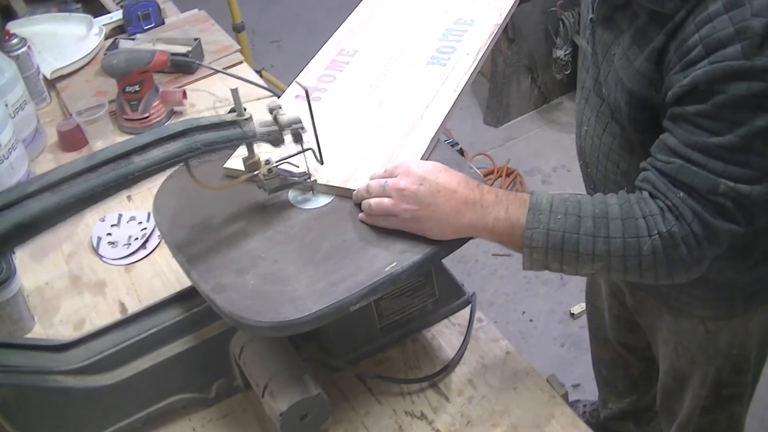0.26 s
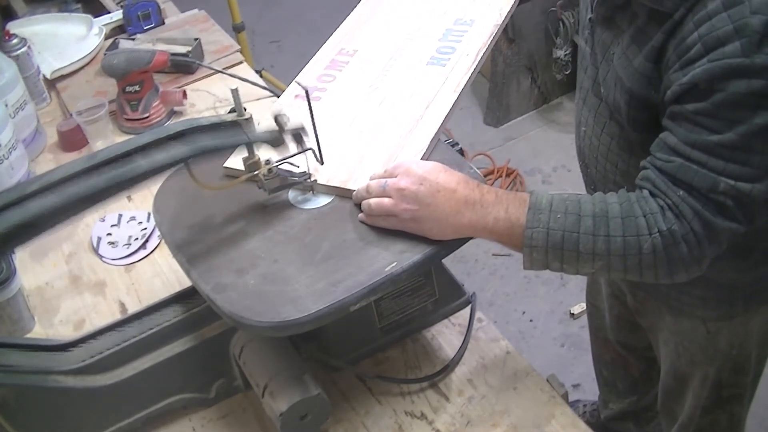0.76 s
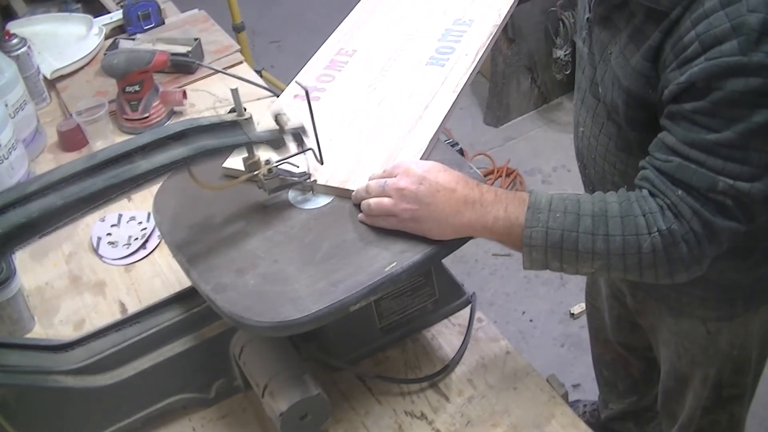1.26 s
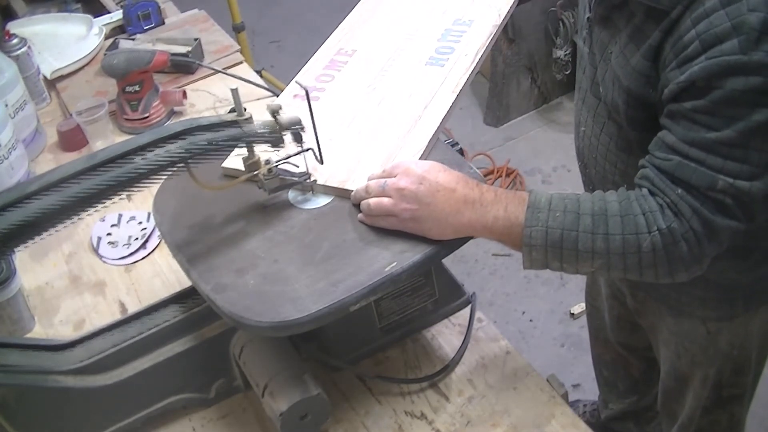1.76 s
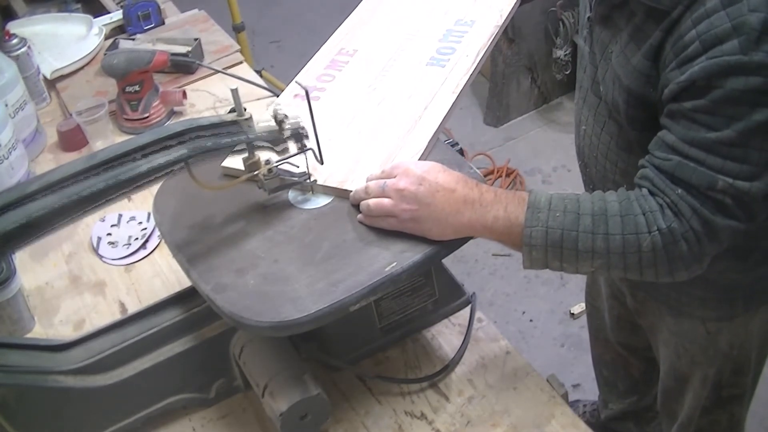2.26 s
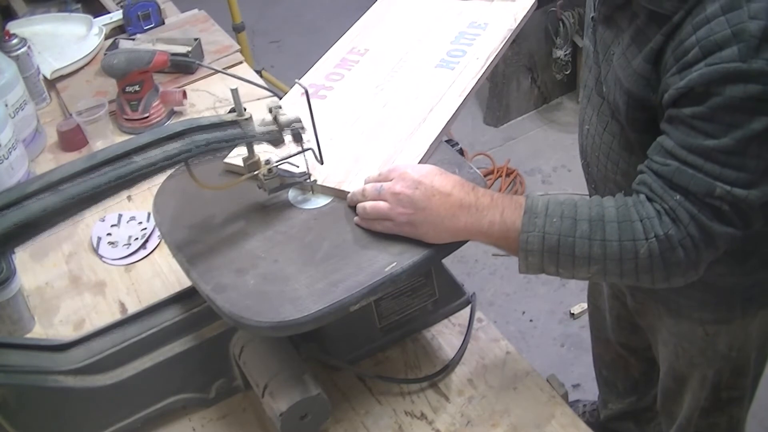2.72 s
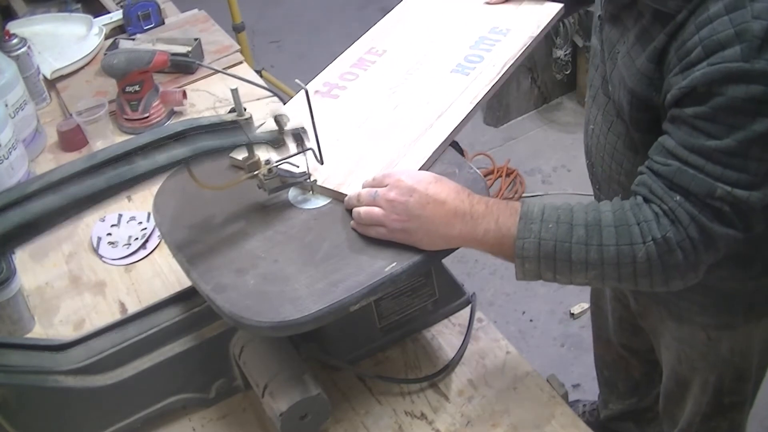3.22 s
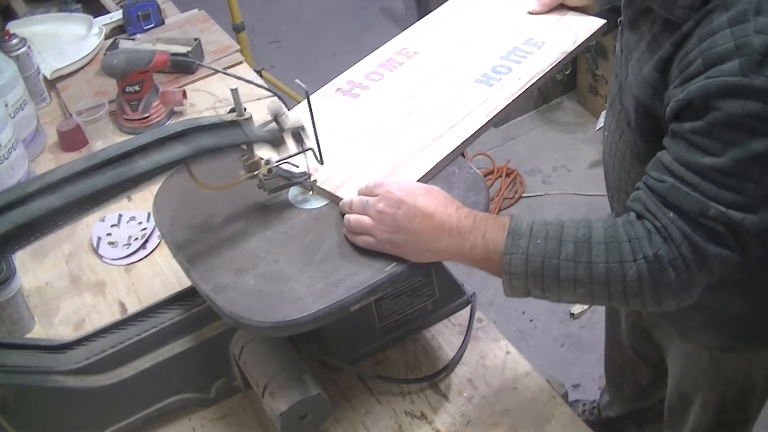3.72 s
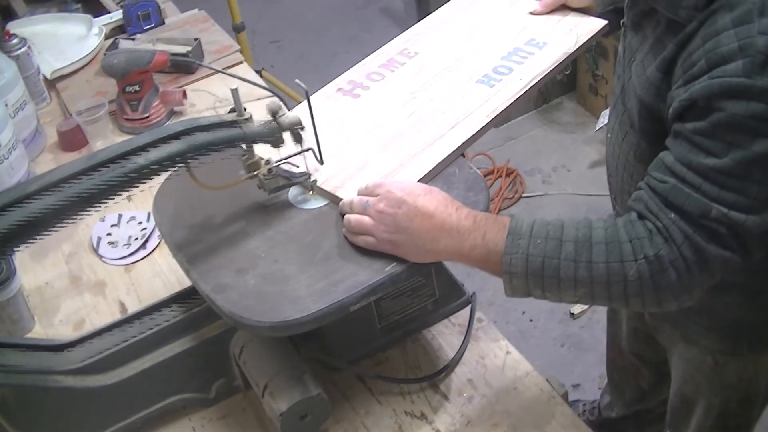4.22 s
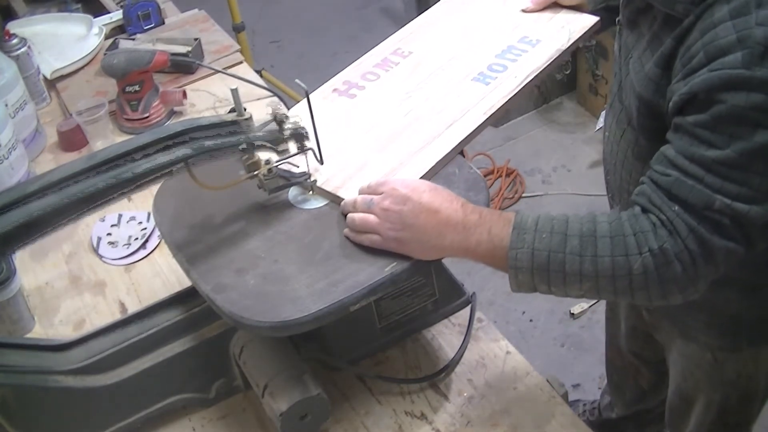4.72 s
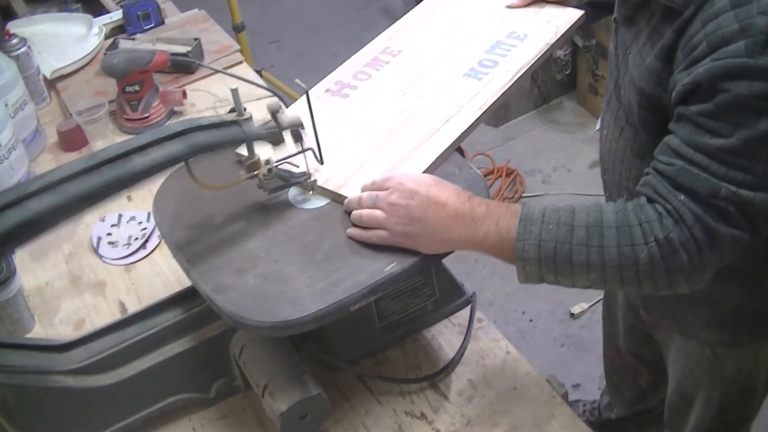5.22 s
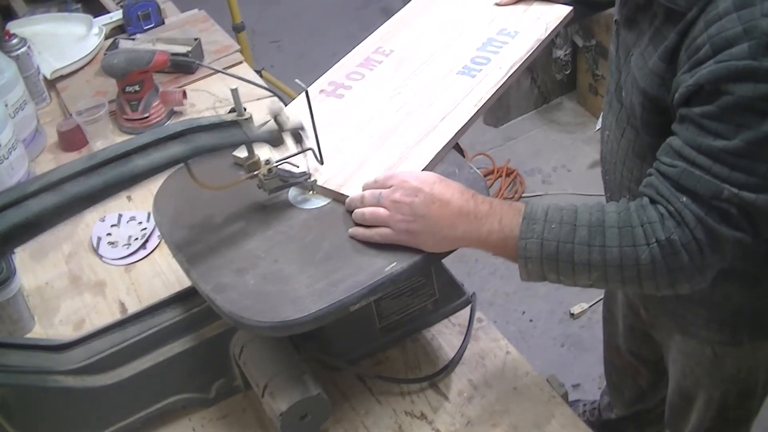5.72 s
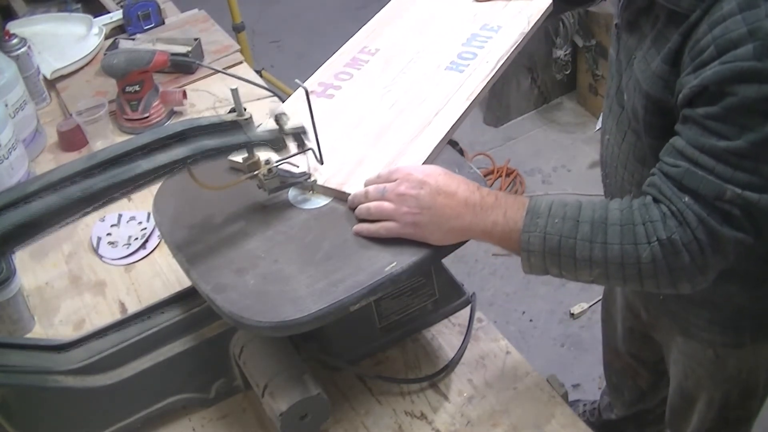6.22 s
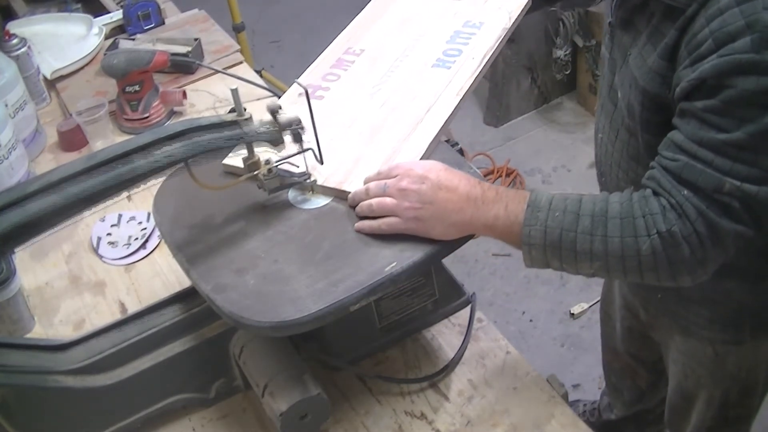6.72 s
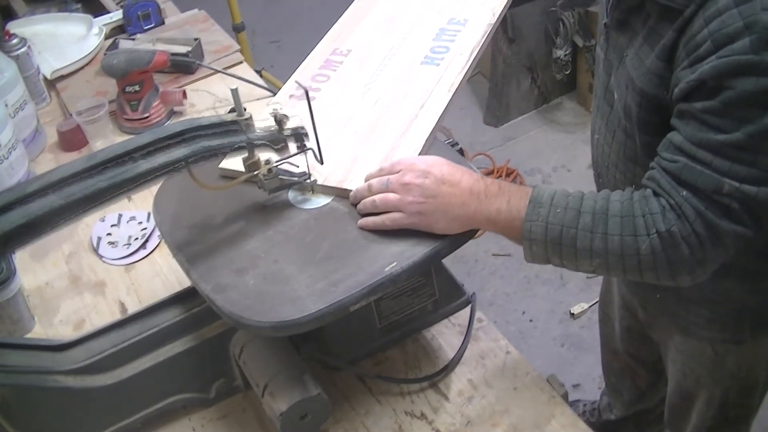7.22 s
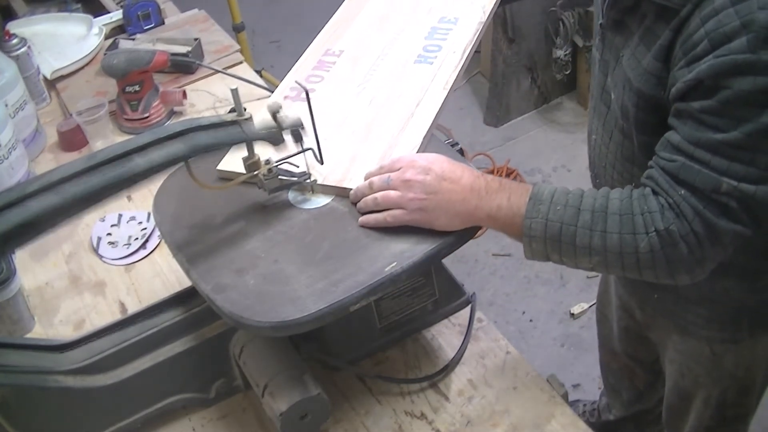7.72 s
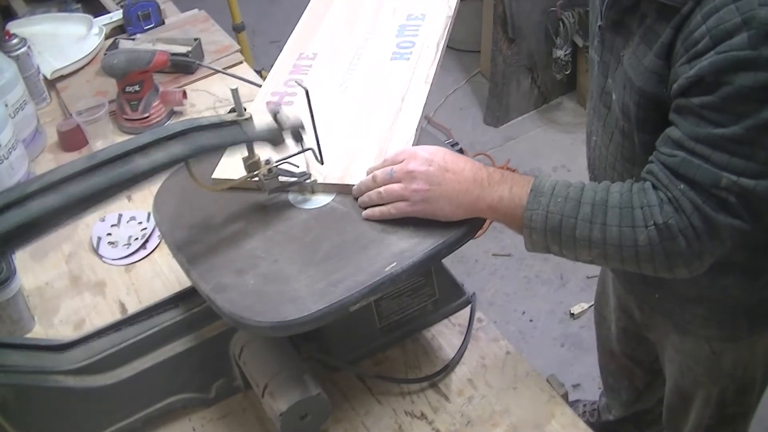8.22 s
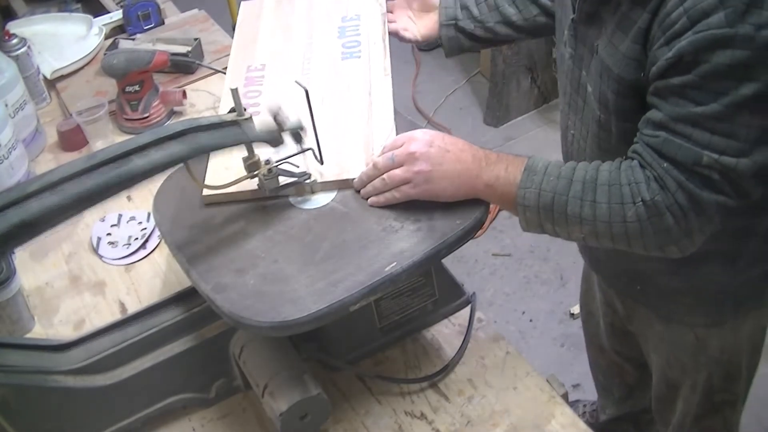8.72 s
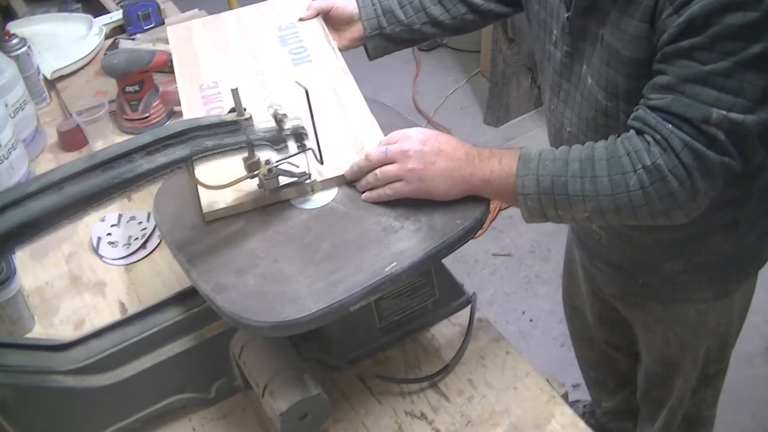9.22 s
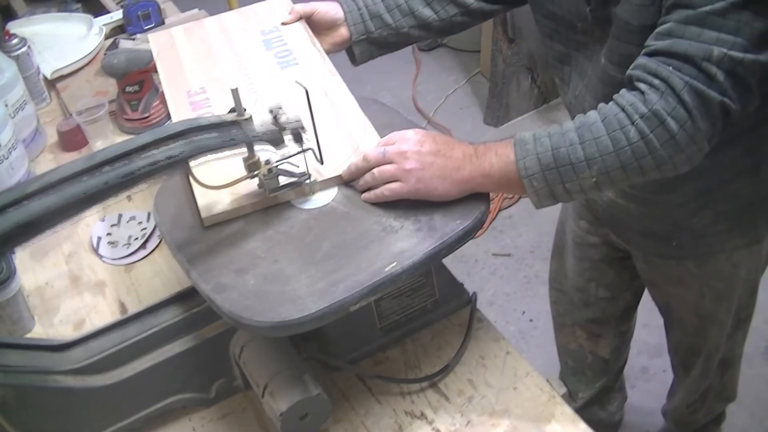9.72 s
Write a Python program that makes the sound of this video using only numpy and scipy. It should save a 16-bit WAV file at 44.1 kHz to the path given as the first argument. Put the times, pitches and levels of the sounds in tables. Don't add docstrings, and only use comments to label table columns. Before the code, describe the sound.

An electric scroll saw runs steadily in a workshop, about thirty strokes a second, its frame rattling and teeth rasping through a board. The wood repeatedly catches and slaps the metal table in short knocking bursts. After about eight seconds it dips briefly, then the same work continues speeded up: much quieter, thin, high and hissy. Close, dry, nearly mono microphone.

```python
import sys
import numpy as np
from scipy import signal
from scipy.fft import rfft, irfft, next_fast_len
from scipy.io import wavfile
from scipy.ndimage import uniform_filter1d, map_coordinates

SR = 44100
rng = np.random.default_rng(int(sys.argv[2]) if len(sys.argv) > 2 else 0)


def how_loud(loudness_db):
    steps = np.asarray(loudness_db, float) / 20
    return 10 ** steps


def file_out(sig):
    cols = np.atleast_2d(sig).T
    lim = np.clip(cols, -1, 1)
    pcm = np.round(lim * 32767).astype(np.int16)
    wavfile.write(sys.argv[1], SR, pcm)


N = 439236

STROKE_HZ, CHANGE_S, FASTER = 31.19, 8.122, 8

# time_s, lead_strokes
CRANK_LEAD = [(0, -.01), (1.4, .06), (2.1, .055), (2.4, 0), (3.6, -.045), (5.5, 0), (6.2, 0), (8.2, -.03)]
# time_s, speed_strokes_per_s
HURRIED_SPEED = [(8.1, 249.3), (9.02, 249.1), (9.05, 238), (9.11, 242.3), (9.17, 245.3), (9.25, 247.7),
                 (9.32, 248.6), (9.6, 248.8), (9.96, 247.5)]
# multiple_of_stroke, before_turn_db, after_turn_db
FRAME_SLOW = ([5.2], [(1, -49), (2, -36), (8, -24), (12, -16), (14, -10), (22, -15), (30, -6), (51, -8)],
              [(3, -4, -4), (6, 3, 3), (13, 3, 3), (20, 10, 10), (22, -2, -6), (23, 3, 0), (24, 5, 4),
              (26, -4, -9), (30, 2, 4), (31, 2, 5), (33, 0, -1), (34, -3, -4), (35, 3, 6), (39, 0, -8),
              (42, 6, 0), (43, 2, -2), (44, 7, 6), (45, -3, -4), (46, -5, -6), (48, 5, 9), (49, 2, 4)])
FRAME_FAST = ([8.6, 9.05, 9.37], [(10, -19), (12, -13), (18, -11), (26, -15), (31, -7), (42, -7),
              (52, -12)], [(12, -1, 0, 5, 5), (13, 2, 5, 4, 2), (14, 5, 9, 3, 11), (15, 0, 0, 1, 4),
              (16, 4, 7, 7, 6), (17, 0, 0, -3, 1), (18, 4, 3, -3, 7), (19, 0, 5, -2, 3), (20, 10, 8, 10, 7),
              (23, 4, 8, 9, 8), (24, 7, 9, 4, 7), (26, -2, -2, -4, -2), (28, 1, 5, 3, 7), (29, 0, 0, 4, 3),
              (30, 4, 0, 3, 3), (31, 4, 6, 6, 9), (32, 0, 1, 5, 4), (34, 4, 0, 0, 0), (35, 7, -1, -3, -3),
              (36, 1, 2, 6, 6), (37, 3, 0, -2, -2), (38, 0, 4, 4, 4), (40, 0, 1, 7, 7), (41, 2, 0, -2, -2),
              (42, 0, 0, 6, 6), (44, 9, 2, 0, 0), (47, 5, 0, 0, 0), (49, 5, 5, 3, 3)])
RATTLE_ANGLE = [
    (26, .45),
    (39, .92),
]
# pitch_hz, density_db (per Hz)
WOOD_COLOUR = [(35, -63.5), (60, -51), (250, -19.5), (398, -11), (527, -14), (607, -10), (666, -13.5),
               (732, -9.5), (1340, -7), (2050, -10), (2250, -11.5), (7570, -11), (16000, -36)]
# pitch_hz, width_hz, level_db
BLADE_RINGS = [(2246, 60, -1), (3442, 32, 2.5), (4633, 51, 5), (5520, 27, 3.5), (7400, 550, -21.5)]
# pitch_hz, level_db
REPEATING_COLOUR = [(100, -23), (1200, 4.5), (1800, 9), (3500, 4.5), (6000, 0), (11000, 2.5), (16000, -8)]
# pitch_hz, width_hz, level_db
BOARD_RINGS = [(874, 250, -4.5), (1630, 490, -3), (2173, 300, -8), (2970, 230, -18.5), (4560, 34, 2.5)]
# middle_s, half_length_s, slap_db, extra_ring_db
BLADE_GRABS = [(0.623, 0.058, -30.5, 1), (0.8, 0.025, -17, 0), (0.955, 0.09, -11, 2),
               (1.093, 0.08, -2.5, 2.5), (1.52, 0.19, -20, 2), (1.98, 0.035, -15.5, 0.5),
               (2.274, 0.19, -0.5, 2.5), (2.677, 0.11, -7.5, 0), (3.065, 0.1, -9, 0.5),
               (3.483, 0.31, -18.5, 3.5), (3.773, 0.18, -11.5, 1.5), (4.55, 0.078, -5, 0.5),
               (5.648, 0.13, -12.5, -1), (6.895, 0.15, -17.5, 2.5), (7.25, 0.12, -19, 3),
               (7.59, 0.1, -5, 0), (7.913, 0.14, -7.5, 1.5), (8.465, 0.026, -5, 6), (8.567, 0.032, -4, 5),
               (8.756, .015, -8, 4.5), (9.052, 0.043, -7, 1.5), (9.68, 0.08, -9, 8), (9.86, 0.13, -1, 6.5)]
# time_s, crank_angle_strokes
DROP_ANGLE = [(.8, .81), (1.5, .81), (2.1, .68), (2.45, .67), (3.4, .79), (3.75, .82), (4.55, .855),
              (5.0, .86), (6.7, .84), (7.5, .8), (7.8, .78), (8.2, .8)]
# time_s, peak_db, ring_hz
HARD_DROPS = [(0.797, -7, 1360), (0.828, -7.5, 1360), (0.859, -9, 1360), (0.923, -9, 1370),
              (0.957, -10, 1110), (0.988, -13, 1060), (1.345, -18, 1390), (1.402, -9.5, 1370),
              (1.469, -11.5, 1170), (1.499, -11, 1080), (1.564, -11.5, 1160), (1.629, -9, 1270),
              (1.917, -11, 1360), (1.983, -9.5, 1310), (2.012, -8, 1380), (2.042, -17.5, 1330),
              (2.111, -11, 1260), (2.139, -13.5, 1290), (2.171, -9, 1350), (2.204, -13, 1350),
              (2.236, -10.5, 1660), (2.269, -12.5, 1180), (2.298, -10, 1280), (2.329, -13, 1270),
              (2.362, -10.5, 1290), (2.395, -9, 1260), (2.69, -12.5, 1280), (3.071, -17, 1870),
              (3.267, -12.5, 1380), (3.298, -12, 1320), (3.332, -9, 1330), (3.359, -9.5, 1350),
              (3.393, -11.5, 1380), (3.425, -10, 1290), (3.456, -12.5, 1360), (3.551, -10.5, 1350),
              (3.588, -16, 1360), (3.62, -14.5, 1360), (3.652, -11.5, 1280), (3.684, -13, 1350),
              (3.716, -13, 1350), (3.748, -8.5, 1360), (3.78, -20, 1360), (3.81, -17.5, 1360),
              (4.453, -12.5, 1370), (4.485, -11, 1370), (4.517, -9.5, 1370), (4.549, -9.5, 1370),
              (4.582, -9, 1370), (4.614, -10, 1370), (4.646, -12.5, 1500), (7.466, -12.5, 1370),
              (7.498, -12, 1480), (7.593, -11.5, 1480), (7.625, -12.5, 1480), (7.657, -14, 1490),
              (7.721, -12, 1490), (7.753, -13.5, 1490), (7.785, -12, 1490), (7.817, -11, 1490)]
# start_s, end_s, crank_angle_strokes, ring_hz, level_db
LOOSE_PARTS = [(3.6, 4.7, 0.266, 1000, -18.5), (5.2, 8.3, 0.21, 940, -13), (6.8, 7.45, 0.2, 880, -15.5),
               (.3, 1.6, .36, 5600, -15.5), (1.7, 3, 0.39, 5580, -16), (8, 8.1, .36, 5620, -19),
               (2.3, 4.5, 0.31, 7300, -14.5), (4.2, 5.6, 0.21, 7400, -15), (6.5, 6.85, .22, 7400, -18),
               (6.8, 7.2, .2, 7550, -11.5), (7.2, 7.36, .2, 7600, -13), (.9, 2.2, .86, 6800, -25),
               (.4, 0.72, 1, 4600, -14), (1.1, 2.6, 0.93, 4600, -10), (3.0, 5.6, .12, 3200, -16),
               (4.3, 3.2, .3, 4500, -11), (7.6, 8.1, 0.23, 4600, -18), (3.5, 4.7, .22, 3050, -13.5),
               (4.3, 4.65, .88, 3000, -14), (6.8, 7.2, .18, 3100, -15.5), (6.6, 7.4, .18, 3000, -11),
               (3.05, 3.45, .8, 2850, -9), (2.55, 2.8, .3, 2750, -11), (4.6, 5.2, .7, 3000, -15),
               (1.2, 2.6, 0.89, 2250, -16.5), (6.55, 5.4, .2, 2200, -13), (3.82, 4.44, .9, 1380, -10.5),
               (2.5, 3.17, .78, 1800, -9.5), (3, 4, .3, 5100, -14), (6.4, 7.45, .9, 1520, -11),
               (5.3, 6.5, 0.41, 1090, -14)]
# time_s, push_db, board_ring_hz, roughness_0_to_1, tooth_contact_db
FEED_SLOW = [(0, -28.5, 1530, 0.3, -3.5), (.25, -30, 1540, 0, -4), (1.2, -29.5, 1310, 0, -0.5),
             (1.6, -28, 1290, 0.18, 0), (2.3, -25, 1320, 0.33, -5), (2.65, -28.5, 1344, 0.29, 2),
             (2.85, -30.5, 1340, 0.23, -2), (2.95, -28, 1400, 0.16, -0.5), (3.03, -26, 1830, 0.2, -3.5),
             (3.17, -27.5, 1740, 0.28, -1.5), (3.22, -27, 1380, 0.26, -2), (3.3, -27, 1380, 0.38, -4.5),
             (3.75, -27.5, 1360, 0.08, -3.5), (4.15, -28, 1320, 0, -2), (4.7, -23.5, 1360, 0.12, -6.5),
             (5.0, -26, 1290, 0.27, -1), (5.45, -29, 1470, 0.02, -4.5), (6.1, -31, 1480, 0, -2.5),
             (6.38, -31, 1380, 0.17, -8), (6.65, -28.5, 1340, 0.03, -1.5), (6.9, -31, 1420, 0, -2),
             (7.35, -28.5, 1400, 0.02, -4.5), (7.6, -24, 1440, 0, -8.5), (8.08, -28, 1440, 0, -3)]
# time_s, push_db, board_ring_hz, roughness_0_to_1, tooth_contact_db
FEED_HURRIED = [(8.16, -43, 10900, 0.5, -3), (8.23, -49, 10200, 0.1, -5), (8.31, -47, 10100, 0.23, -3),
                (8.42, -48, 10850, 0.27, -5), (8.55, -46, 11220, 0.38, -2), (8.63, -43, 10400, 0.75, -7),
                (8.71, -48.5, 10300, 0.2, -6), (8.93, -49, 10070, 0.26, -5), (9.0, -50.5, 10200, 0.1, -9),
                (9.03, -50.5, 9800, 1, -10.5), (9.08, -49.5, 9600, 0.54, -8), (9.13, -49, 9900, 0.1, -7),
                (9.23, -47.5, 10400, 0.16, -6), (9.44, -47.5, 9600, 0.14, -7), (9.6, -46.5, 10180, 0.2, -8),
                (9.67, -49, 10200, 0.26, -1), (9.8, -46.5, 10800, 0.34, -6), (9.96, -46, 10700, 0.3, -2)]
# frame_db, frame_share_of_push, usual_push_db, slot_ring_hz, rasp_db
PUSH_SLOW = (-37, 0.0028, -14, 2510.5, -3)
PUSH_FAST = (-49, 0.97, -45.5, 7300, -6)
# low_hz, high_hz
LEVEL_BANDS_SLOW = [
    (250, 750),
    (800, 1900),
    (2000, 4500),
    (5000, 11000),
]
LEVEL_BANDS_FAST = [
    (2600, 6000),
    (7000, 12500),
    (13000, 15600),
]
# time_s, pitch_ratio (to usual)
SLOT_PITCH = [(0, 0.79), (.12, 0.81), (.16, 1.47), (1.38, 1.38), (1.44, 1.11), (2.9, 0.97), (3.0, 1.07),
              (3.6, 1.18), (4.3, 1.15), (5.25, 1.23), (5.33, 1.23), (6.0, 1.26), (6.6, 1.1), (6.66, 0.9),
              (7.1, 0.9), (7.16, 1.3), (7.38, 1.27), (7.43, 1.02), (7.65, 1.12), (7.7, 1.1), (8.12, 1.17)]
# time_s, low_ring_hz, low_ring_db, main_ring_db
HAND_HOLD = [(0, 1090, 3, -5), (.4, 1020, 1, -7), (.9, 1060, 9.5, 0), (1.4, 1040, -0.5, 2),
             (2.0, 1010, 0.5, 8), (2.4, 980, -1.5, -9), (2.8, 1080, -12, 5.5), (3.05, 1120, -5, 4),
             (3.2, 1010, -5.5, 2), (3.5, 960, 5, -7.5), (4.1, 1010, -16, 3.5), (4.8, 945, 1, 1),
             (5.2, 990, 0.5, -12), (5.6, 1040, 5.5, -10), (6.1, 1050, -6.5, -4.5), (6.9, 930, -9, -2.5),
             (7.3, 970, -5, -3), (7.6, 1110, -1.5, 8.5), (8.1, 1100, -4, 11), (8.13, 1000, -28, -5.5)]
# pitch_hz, density_db (per Hz)
HISS_COLOUR = [(15, -28), (25, 3), (130, -7.5), (262, -3.5), (387, -5), (876, -1), (1570, -3.5), (1700, 0),
               (2100, -4), (2600, -14), (3380, -18), (5720, -120)]
# start_s, end_s, level_db
HISS_STEPS = [(8.13, 8.387, -62.5), (8.43, 8.828, -60.5), (9.214, 9.343, -60.5), (9.58, 9.994, -61.5)]
# pitch_hz, side_minus_mid_db
WALL_WIDTH = [(60, -49), (130, -36), (290, -25), (640, -25.5), (1410, -28.5), (3100, -15.5), (6820, -20.5),
              (15000, -35.5)]


def evened(x):
    return x / np.sqrt(np.mean(abs(x) ** 2) + 1e-20)


def follow(at, table):
    points, *columns = np.transpose(table)
    return [np.interp(at, points, column) for column in columns]


def colour(x, points, speedup=1):
    size = next_fast_len(len(x))
    hz, db = np.transpose(points)
    shape = np.interp(np.log(np.fft.rfftfreq(size, 1 / SR) + 1), np.log(hz * speedup + 1), db)
    return irfft(rfft(x, size) * how_loud(shape), size)[:len(x)]


def resonate(x, hz, width):
    r = np.exp(-np.pi * width / SR)
    if np.ndim(hz) == 0:
        return 2 * signal.lfilter([1 - r], [1, -r * np.exp(2j * np.pi * hz / SR)], x).real
    turn = np.exp(2j * np.pi * np.cumsum(hz) / SR)
    return 2 * (turn * signal.lfilter([1 - r], [1, -r], x / turn)).real


def drift(shape, strokes):
    keep = np.exp(-1 / max(strokes, .1))
    noise = rng.standard_normal((shape[0] + 60, shape[1]))
    return evened(signal.lfilter([1], [1, -keep], noise, axis=0)[60:])


def play(cycles, turns):
    closed = np.hstack([cycles, cycles[:, :1]])
    return map_coordinates(closed, [turns, turns % 1 * cycles.shape[1]], order=1)


def once_a_turn(turns, angle):
    return np.flatnonzero(np.diff(np.floor(turns - angle)) > 0)


def frame(t, turns, rough, orders, memory, loose):
    turned_s, trend, odd = orders[0], np.transpose(orders[1]), np.transpose(orders[2])
    order = np.arange(trend[0, 0], trend[0, -1] + 1)
    column = order.astype(int)
    levels = np.interp(order, *trend) + odd[1:] @ (order == odd[0][:, None])
    count = int(turns[-1]) + 2
    turned = np.clip((np.arange(count)[:, None] - np.interp(turned_s, t, turns)) / 12 + .5, 0, 1)
    db = levels[0] + turned @ np.diff(levels, axis=0)
    angle = rng.uniform(-.3, .5, len(order))
    for start, strokes in RATTLE_ANGLE:
        angle[order >= start] = strokes + .3 * rng.uniform(-0.991, 1, np.sum(order >= start))
    phase = -2 * np.pi * np.cumsum(angle)
    wander = drift((count, len(order)), memory) + 1j * drift((count, len(order)), memory)
    z = np.zeros((count, 1025), complex)
    z[:, column] = how_loud(db) * np.exp(1j * phase) * (1 + (loose + .35 * order / 50) * wander)
    stroke_rough = np.interp(np.arange(count), turns, rough)[:, None]
    z[:, column] *= 1 - stroke_rough * np.clip(order / 28, 0, .9)
    return play(irfft(z, axis=1), turns) / np.sqrt(np.sum(how_loud(2 * levels[0])) / 2) * 1024


def downstroke(angle):
    return how_loud(1.35 * np.cos(2 * np.pi * (angle - .12)) + 1.04 * np.cos(4 * np.pi * (angle - .35)))


def rasp(turns, rough, speedup):
    count, size = int(turns[-1]) + 2, 8192 // speedup
    fibres = rfft(drift((count, size // 4), 2.7 * speedup ** .5), axis=1)
    steady = colour(evened(play(irfft(fibres, size, axis=1), turns)), REPEATING_COLOUR, speedup)
    noise = rng.standard_normal(len(turns))
    burst_db = 3.25 * np.minimum(rng.exponential(1, len(turns)), 4)
    splinters = evened(noise * how_loud(burst_db))
    fresh = splinters * (how_loud(-7.0) + how_loud(5.5) * rough)
    x = colour((np.sqrt(1 - rough) * steady + fresh) * downstroke(turns % 1), WOOD_COLOUR, speedup)
    scale = 1 / np.sqrt(np.mean(colour(splinters, WOOD_COLOUR, speedup) ** 2))
    rings = 0
    for hz, width, db in BLADE_RINGS:
        if hz * speedup < 18000:
            rings = rings + how_loud(db) * resonate(x, hz * speedup, width * speedup)
    return scale * (x + rings)


def grabs(t):
    mid, half, slap_db, ring_db = np.transpose(BLADE_GRABS)[:, :, None]
    coarse = t[::64]
    bell = np.exp(-((coarse - mid) / np.maximum(half, .01)) ** 2)
    slap = how_loud(-21.5) + (how_loud(slap_db) * bell).sum(0)
    return np.interp(t, coarse, 20 * np.log10(slap)), np.interp(t, coarse, (ring_db * bell).sum(0))


def slaps(turns, rough, slap_db, drop_angle, ring_hz, speedup):
    hit = once_a_turn(turns, drop_angle + .02)
    hit_rough = rough[hit]
    late, force, bounce = rng.standard_normal((len(hit), 3)).T
    period = SR / STROKE_HZ / speedup
    uneven_db = 5 * hit_rough ** 2 * (-1.) ** np.floor(turns[hit])
    size = how_loud(slap_db[hit] + uneven_db + 3.9 * hit_rough * np.clip(force, -2, .5))
    at = hit + 0.014 * period * hit_rough * late
    if speedup == 1:
        when_s, peak_db, knock_hz = np.transpose(HARD_DROPS)
        when = when_s * SR
        near = abs(hit[:, None] - when).argmin(0)
        at[near] = when + 20
        size[near] = how_loud(1.23 * (peak_db + 11.5))
        sample = np.arange(len(turns))
        last = np.searchsorted(when, sample) - 1
        fresh = (last >= 0) & (sample - when[last] < .9 * period)
        ring_hz = np.where(fresh, knock_hz[last], ring_hz)
    clicks = np.zeros(len(turns))
    for delay, share in [(0, 0.71), (.07, 2 * hit_rough), (.13, 0.69 * hit_rough), (.2, 0.39)]:
        place = at + period * delay * (1 + 0.21 * hit_rough * bounce)
        np.add.at(clicks, np.clip(place.astype(int), 0, len(turns) - 1), share * size)
    modes = [(ring_hz / speedup, 190, 5.5)] + [m for m in BOARD_RINGS if m[0] * speedup < 18000]
    ring = 0
    for hz, width, db in modes:
        struck = resonate(clicks, hz * speedup, width * speedup)
        ring = ring + how_loud(db) * resonate(struck, hz * speedup, 3.3 * width * speedup)
    thin = signal.lfilter(*signal.butter(2, 600 * speedup, "high", fs=SR), ring)
    return evened(thin) * np.sqrt(np.mean(size ** 2))


def chatter(t, turns):
    out, u = np.zeros(len(t) + 800), np.arange(800) / SR
    for start, end, angle, hz, db in LOOSE_PARTS:
        hit = once_a_turn(turns, angle)
        hit = hit[(t[hit + 1] > start) & (t[hit + 1] < end)]
        force, pitch, late = rng.standard_normal((len(hit), 3)).T[:, :, None]
        ease = np.clip(np.minimum(t[hit] - start, end - t[hit]) / 0.087, 0, 1)[:, None]
        lasting = u / (.0014 + 5.9 / 10 / np.sqrt(hz) / 20)
        ring = lasting * np.exp(1 - lasting) * np.sin(2 * np.pi * hz * (1 + .008 * pitch) * u)
        delay = (12 * abs(late)).astype(int) * (hit[:, None] < len(t) - 80)
        place = hit[:, None] + delay + np.arange(800)
        np.add.at(out, place, ring * ease * how_loud(db + 10 + 2.7 * force))
    return out[:len(t)]


def follow_feed(x, t, levels_db, bands, speedup):
    hz, at, z = signal.stft(x, SR, nperseg=512, noverlap=384)
    patches = uniform_filter1d(rng.standard_normal(z.shape), 60 // speedup, 1)
    patches = evened(uniform_filter1d(patches, 4, 0))
    z *= how_loud(1.2 * patches * (hz > 800 * speedup)[:, None])
    power = np.array([(abs(z[(hz > lo) & (hz < hi)]) ** 2).sum(0) for lo, hi in bands])
    own_db = 10 * np.log10(uniform_filter1d(power, int(44 / speedup ** .5), 1) * 4 / 3)
    lift_db = np.array([np.interp(at + t[0], t, level) for level in levels_db[:len(bands)]]) - own_db
    centres = np.log(bands).mean(1)
    blend = np.array([np.interp(np.log(hz + 1), centres, row) for row in np.eye(len(bands))]).T
    gain_db = blend @ lift_db
    stand = np.clip((350 * speedup - hz) / (200 * speedup), 0, 1)[:, None]
    gain_db += stand * (gain_db.mean(1, keepdims=True) - gain_db)
    return signal.istft(z * how_loud(gain_db), SR, nperseg=512, noverlap=384)[1][:len(t)]


def saw(t, turns, feed, laws, bands, orders, speedup):
    push_db, ring_hz, rough, contact_db = follow(t, feed)
    frame_db, frame_share, usual_db, slot_hz, rasp_db = laws
    rough = np.clip(rough, 0, 1)
    slap_db, ring_db = grabs(t)
    lifted = how_loud(slap_db)
    teeth_db = push_db + contact_db + .5 * ring_db
    dust_db = -37.5 + 0.64 * (teeth_db + 30)
    levels_db = [frame_db + frame_share * (push_db - usual_db), push_db + ring_db, teeth_db, dust_db]
    drop_angle = follow(t, DROP_ANGLE)[0]
    count = int(turns[-1]) + 2
    wander = np.interp(turns, np.arange(count), drift((count, 1), 5 * speedup)[:, 0])
    slot = slot_hz * follow(t, SLOT_PITCH)[0] * (1 + 0.033 * wander)

    torn = np.exp(8.4 * (np.cos(2 * np.pi * (turns - drop_angle - .12)) - 1))
    wood = how_loud(rasp_db) * rasp(turns, rough, speedup) * (1 + 0.43 * lifted * torn) / (1 + 0.18 * lifted)
    low_hz, low_db, held_db = follow(t, HAND_HOLD)
    free = evened(how_loud(6 * np.cos(2 * np.pi * (turns - drop_angle - .1))))
    wood += how_loud(low_db) * resonate(wood, low_hz, 130)
    main_db = 4 + held_db + ring_db + .4 * (push_db - usual_db)
    wood += how_loud(main_db) * resonate(wood * free, ring_hz, 190 * speedup)
    wood += how_loud(0.5) * resonate(wood, slot, 300 * speedup)

    x = wood + slaps(turns, rough, slap_db, drop_angle, ring_hz, speedup)
    rattle = frame(t, turns, rough, orders, 8 * speedup, .17 / speedup ** .1)
    x = x + rattle / (1 + 1.2 * lifted)
    x = x + chatter(t, turns)
    return follow_feed(x, t, levels_db, bands, speedup)


def player_hiss(t):
    rest_db = -66.5
    points = HISS_COLOUR + [(5000, -22.5), (16000, -38)]
    level_db = rest_db + sum((db - rest_db) * (t > start) * (t < end) for start, end, db in HISS_STEPS)
    hiss = evened(colour(rng.standard_normal(len(t)), points))
    return how_loud(uniform_filter1d(level_db, size=600)) * hiss


def walls(mid):
    echoes = rng.standard_normal(3000) * how_loud(-60 * np.arange(3000) / SR / 0.06)
    scattered = signal.oaconvolve(mid, echoes / np.linalg.norm(echoes))[:N]
    return colour(scattered, WALL_WIDTH) + mid / 80


def scene():
    t, change = np.arange(N) / SR, round(CHANGE_S * SR)
    slow, fast = t[:change], t[change:]
    slow_turns = 1 + STROKE_HZ * slow + follow(slow, CRANK_LEAD)[0]
    fast_turns = np.cumsum(follow(fast, HURRIED_SPEED)[0]) / SR
    first = saw(slow, slow_turns, FEED_SLOW, PUSH_SLOW, LEVEL_BANDS_SLOW, FRAME_SLOW, 1)
    second = saw(fast, fast_turns, FEED_HURRIED, PUSH_FAST, LEVEL_BANDS_FAST, FRAME_FAST, FASTER)
    second = second + player_hiss(fast)
    fade = np.clip(abs(t - CHANGE_S) / 0.041, .01, 1) ** 1.95
    mid = np.concatenate([first, second]) * fade
    side = walls(mid)
    return np.array([mid + side, mid - side])


def low_pass(x):
    return signal.sosfilt(signal.butter(12, 16600, fs=SR, output="sos"), x)


def record(dry):
    headroom = .6
    rounded = headroom * np.tanh(dry / headroom)
    treble_limit = signal.firwin(511, 15700, window=("kaiser", 9), fs=SR)[None]
    mix = signal.oaconvolve(rounded, treble_limit, "same")
    return low_pass(mix)


dry = scene()
out = record(dry)
file_out(out)
```